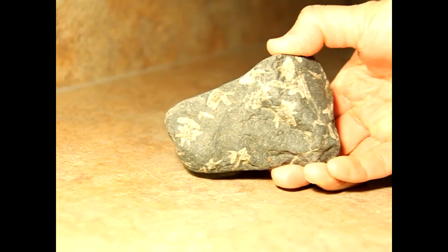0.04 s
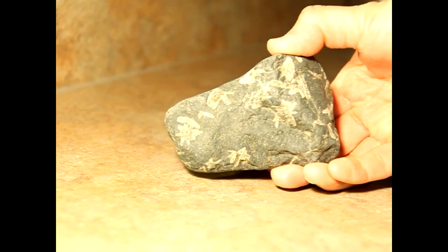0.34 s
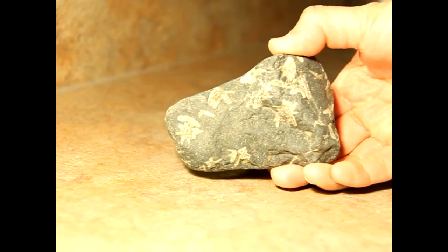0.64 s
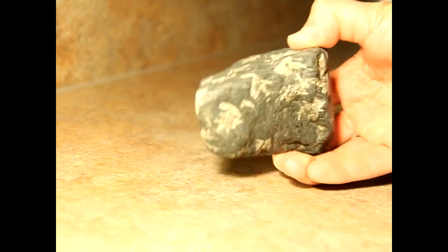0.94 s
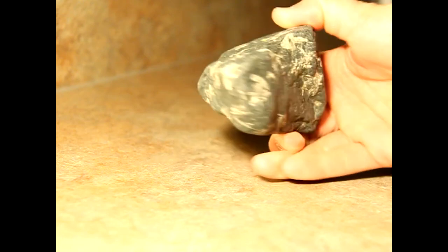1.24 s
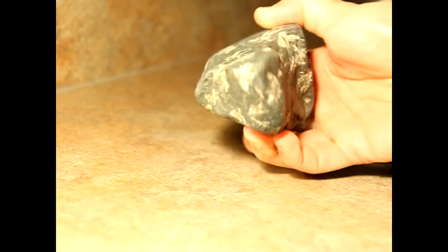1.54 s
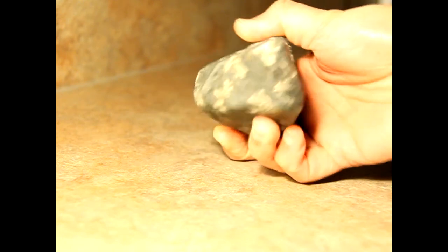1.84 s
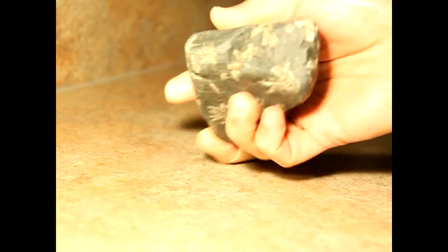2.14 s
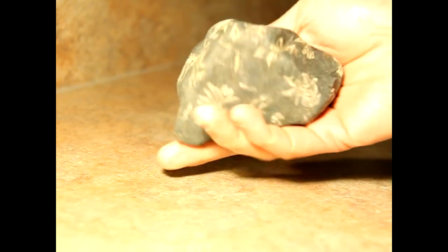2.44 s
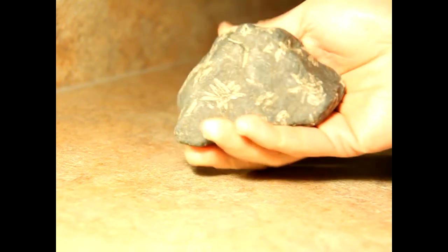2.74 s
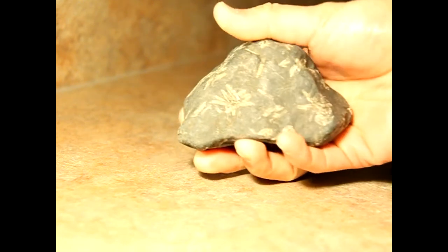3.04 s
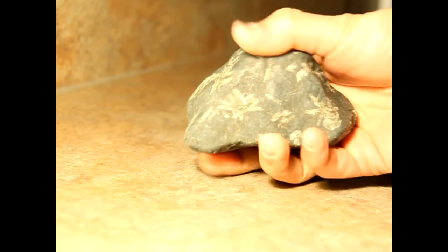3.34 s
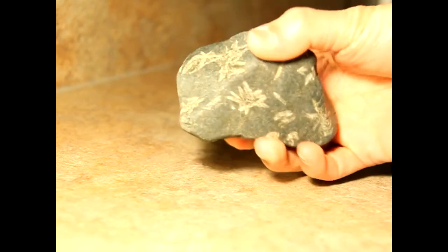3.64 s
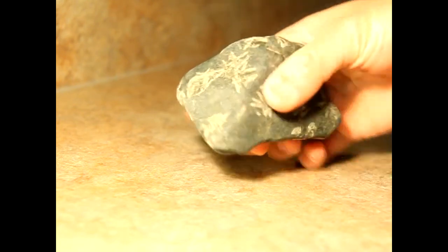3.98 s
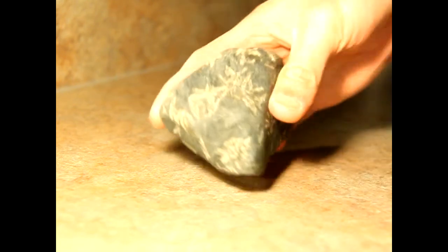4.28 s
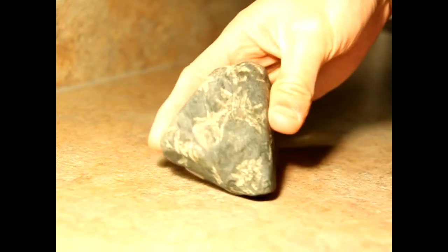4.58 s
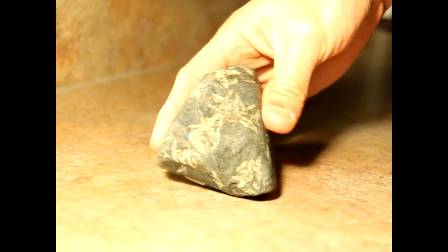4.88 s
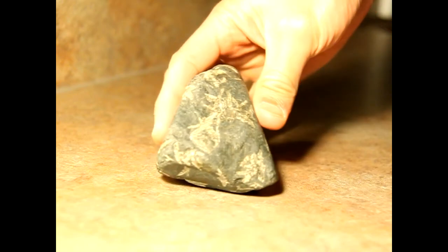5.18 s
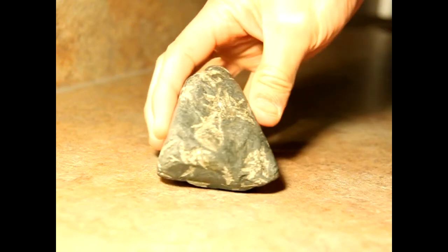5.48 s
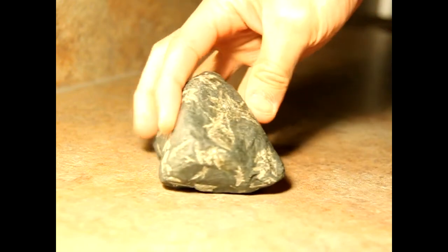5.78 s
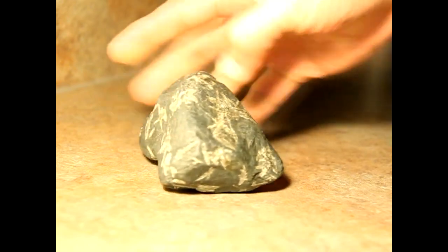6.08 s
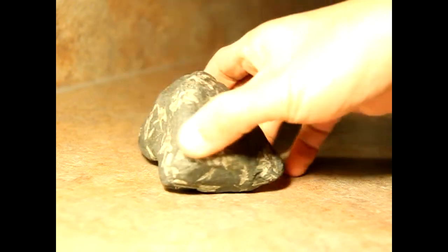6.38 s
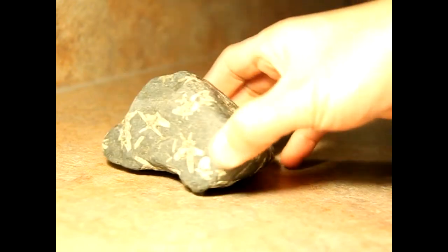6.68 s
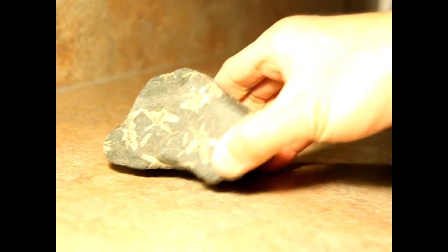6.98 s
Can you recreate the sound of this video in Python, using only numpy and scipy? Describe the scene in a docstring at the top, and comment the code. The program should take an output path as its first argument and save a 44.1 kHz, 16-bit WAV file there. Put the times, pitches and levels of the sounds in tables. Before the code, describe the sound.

Skin hisses softly on a turned stone, which is set on a countertop with a sharp, booming knock and pushed in growling scrapes.

```python
"""Skin hisses softly on rough rock as a hand turns a fist-sized stone, over faint room air and hum.
A fingertip squeaks and the stone pats the palm. It is set on a countertop, rocked onto its flat side
with a sharp knock that overloads the microphone, then pushed round in two scrapes as a fingernail
drags over it. Knocks boom in the hollow counter and stick-slip makes it growl; the contacts echo
off the near walls and ring in a small room."""
import sys
import numpy as np
from scipy import signal
from scipy.fft import rfft, irfft
from scipy.io import wavfile

SR = 44100
rng = np.random.default_rng(int(sys.argv[2]) if len(sys.argv) > 2 else 0)


def transcribe(signal):
    """Save signal, clipped to [-1, 1], as a 16-bit WAV file at the path in sys.argv[1]."""
    frames = np.atleast_2d(signal).T
    limited = np.clip(frames, -1, 1)
    pcm = np.round(limited * 32767).astype(np.int16)
    wavfile.write(sys.argv[1], SR, pcm)


N = 309582
TIME = np.arange(N) / SR
TOP_HZ = 15800

# tone of the room air: (frequency [Hz], level [dB])
AIR_EQ = [(25, -8.5), (60, -10), (90, -5), (130, -1.5), (200, -2.5), (420, -5), (540, -4), (680, -9),
          (1500, -10.5), (3000, -13), (6000, -15.5), (10000, -20), (15500, -24.5)]
# skin strokes as the fingers turn the stone and shift grip: (middle [s], length [s], peak level [dB])
FINGER_STROKES = [(.86, 0.21, -66), (1.08, .28, -68), (1.238, 0.17, -65.5), (1.513, 0.032, -54),
                  (1.542, 0.11, -57.5), (1.688, .16, -61.5), (1.878, 0.12, -58.5), (2.017, 0.11, -59),
                  (2.16, 0.082, -60.5), (2.263, 0.17, -60), (2.296, 0.033, -50.5), (2.355, 0.065, -60),
                  (2.492, 0.21, -59), (2.717, 0.16, -63), (2.833, 0.29, -61.5), (2.942, .1, -58),
                  (3.24, 0.13, -66.5), (3.37, .12, -64.5), (3.513, 0.2, -57.5), (3.659, 0.17, -58),
                  (3.85, .09, -65), (3.96, 0.15, -59.5), (4.167, .24, -59.5), (4.33, 0.15, -63),
                  (4.902, 0.16, -64.5), (5.026, 0.15, -67.5), (5.24, 0.37, -72)]
# tone of skin on rock: (frequency [Hz], level [dB])
SKIN_EQ = [(880, -28), (1500, -14), (2670, -3), (3720, -4), (4310, -2.5), (5090, -3), (11000, -0.5),
           (13000, -1), (15500, -6)]
# gaps between fingers and stone colour the hiss: (time [s], level [dB], half length [s], centre [Hz])
FINGER_GAPS = [(0.852, -73, .05, 8350), (1.521, -65.5, 0.019, 2200), (2.46, -68, .08, 4300),
               (3.55, -67, .07, 13000), (3.87, -68, 0.05, 13700), (4.14, -64, 0.037, 8340),
               (4.219, -66.5, 0.057, 6000)]
# the stone drops against the palm: (time [s], level [dB])
PALM_PATS = [(1.84, -10), (1.872, -18)]
# tone of the palm: (frequency [Hz], level [dB])
PALM_EQ = [(30, -12), (80, 1), (150, 3), (250, -10), (600, -26), (3000, -47)]
# slaps off the near walls: (delay [s], level [dB])
WALL_ECHOES = [(.0072, -9), (.0130, -14), (.0226, -14), (.0312, -17), (.0372, -16.5)]
# long ring of the counter and its cabinet: (frequency [Hz], level over the direct sound [dB], t60 [s])
CABINET_MODES = [(131.3, 7, 0.37), (162, 9.5, 0.48), (193.2, 7.5, 0.69), (248.1, 9, 0.58),
                 (266.6, 0.5, 0.71), (398, -3, 0.77), (453, 2.5, 0.74), (538, 4, .65), (668, 1, 0.77),
                 (745, -6.5, 0.96), (803, 6, .55), (1179, 7, 0.22), (1466, 7, 0.11), (2060, -8, .15)]
# bands of the diffuse room tail: (frequency [Hz], starting level [dB], t60 [s])
ROOM_TAIL = [(100, -39.5, 0.66), (252, -33.5, 0.43), (596, -38, 0.5), (1410, -36.5, 0.53),
             (3000, -37, 0.39), (6050, -35, 0.18), (14100, -39, 0.16)]
# stone meets counter; a higher corner is harder: (time [s], force [dB], corner [Hz], crunch send [dB])
STONE_KNOCKS = [(4.666, 21, 386, -18), (4.879, 7.5, 160, -37), (4.9368, 13, 300, -19.5),
                (5.5388, 14.5, 246, -29), (5.548, 17, 181, -29), (5.592, 21.5, 181, -21),
                (5.671, 29.5, 980, -13.5), (5.6856, 12, 650, -4.5), (5.945, 11, 161, -39),
                (6.4657, 5, 420, -3), (6.5313, 13, 450, -4)]
# the counter's answer to a tap: (frequency [Hz], level [dB])
COUNTER_EQ = [(30, -35), (75, -14), (120, -6.5), (220, -6), (330, -2.5), (470, 1.5), (640, -5),
              (1000, -9.5), (1550, -6.5), (2300, -13.5), (3000, -11.5), (4000, -16.5), (5200, -26),
              (8000, -22.5), (11000, -28), (14500, -17)]
# pushes that slide the stone: (start [s], attack [s], hold [s], release t60 [s], judder [dB], grit [dB])
PUSHES = [(5.298, 0.037, 0.18, .1, -67.5, -88), (5.526, 0.07, 0.073, .03, -35.5, -55.5),
          (5.862, 0.036, 0.07, 0.11, -41.5, -60), (6.27, 0.052, .03, .3, -60, -68),
          (6.409, 0.061, 0.089, 0.27, -27, -44.5), (6.858, 0.034, .125, .1, -39, -58.5)]
# low growl of the slide: (frequency [Hz], level [dB])
JUDDER_EQ = [(40, -60), (85, -16), (130, -10.5), (190, -2.5), (280, 1.5), (420, -3), (560, -13),
             (800, -27.5), (1500, -39), (4000, -72)]
# gritty top of the slide: (frequency [Hz], level [dB])
GRIT_EQ = [(300, -19), (700, 6), (950, 2.5), (1200, 4), (1650, -4), (2050, 0.5), (2400, -10), (2900, -3.5),
           (3600, -9), (4100, -14), (7000, -17.5), (9800, -26.5), (12300, -20.5), (15500, -27)]
# a fingernail drags over the stone: (start [s], attack [s], hold [s], release t60 [s])
NAIL_MOVE = (6.268, .015, .05, 0.043)
# the nail's hardest catches: (time [s], level [dB])
NAIL_TICKS = [(6.296, -24.5), (6.3262, -25), (6.332, -28)]
# tone of nail on stone: (frequency [Hz], level [dB])
NAIL_EQ = [(40, -34), (300, -8), (1000, 1), (1500, -8), (2550, -7), (2980, 1.5), (3450, -6.5), (4200, -3),
           (6000, -12), (8000, -13), (10000, -24), (15000, -27)]


def amp(db):
    """Decibels to gain."""
    return 10 ** (np.asarray(db) / 20)


def unit(x):
    """Scale to rms 1."""
    return x / np.sqrt(np.mean(x ** 2))


def add(out, s, sound):
    """Mix a short sound in at time s."""
    part = out[int(s * SR):][:len(sound)]
    part += sound[:len(part)]


def convolve(x, response):
    """Pass a sound through an impulse response."""
    return signal.oaconvolve(x, response)[:len(x)]


def eq(x, curve, size=4096):
    """Minimum-phase EQ through the points (frequency [Hz], level [dB])."""
    hz, db = np.transpose(curve)
    bin_hz = np.maximum(np.fft.rfftfreq(size, 1 / SR), 1)
    gain = amp(np.interp(np.log(bin_hz), np.log(hz), db))
    cepstrum = irfft(np.log(gain))
    cepstrum[1:size // 2] *= 2
    cepstrum[size // 2 + 1:] = 0
    return convolve(x, irfft(np.exp(rfft(cepstrum))))


def butter(x, hz, kind="low", order=2):
    """Gentle low-pass or high-pass."""
    sections = signal.butter(order, min(hz, TOP_HZ), kind, fs=SR, output="sos")
    return signal.sosfilt(sections, x + 1e-18)


def taps(rows, size=N):
    """One impulse for each row of (time [s], level [dB])."""
    s, db = np.transpose(rows)
    return np.bincount(np.abs(s * SR).astype(int), amp(db), size)[:size]


def background(air_db=-63, hum_db=-76.5, hum_hz=119):
    """A quiet bed of room air, microphone hiss and faint appliance hum."""
    air = unit(eq(rng.standard_normal(N), AIR_EQ))
    hum = unit(np.sin(2 * np.pi * hum_hz * TIME))
    return amp(air_db) * air + amp(hum_db) * hum


def grains(rate_hz, spread_db):
    """Random tiny impacts of uneven size."""
    hits = rng.random(N) < rate_hz / SR
    sizes = amp(spread_db * rng.standard_normal(N).clip(-2, 2))
    return hits * sizes * rng.choice([-1, 1], N)


def stroke(middle, length, edge_db=-12):
    """Speed of a finger stroke: a smooth swell, down to edge_db half a length from its middle."""
    return amp(np.maximum(edge_db * (2 * (TIME - middle) / length) ** 2, -200))


def hand(flesh_db=-15.5, gap_q=8):
    """Skin hisses over the rock's fine grain, louder as it slides faster; the flesh rumbles with it."""
    moves = [*FINGER_STROKES, (2.5, 6.3, -75)]  # one long, light touch while the stone turns
    speed = np.sqrt(sum((amp(db) * stroke(s, length)) ** 2 for s, length, db in moves))
    friction = eq(grains(rate_hz=9000, spread_db=1), SKIN_EQ)
    hiss = unit(butter(friction, 1800, "high"))
    flesh = unit(butter(butter(rng.standard_normal(N), 420), 170, "high"))
    out = speed * (hiss + amp(flesh_db) * flesh)
    for s, db, half_length, hz in FINGER_GAPS:
        swell = signal.windows.gaussian(int(6 * half_length * SR), half_length * SR)
        hollow = signal.lfilter(*signal.iirpeak(hz, gap_q, fs=SR), rng.standard_normal(len(swell)))
        add(out, s - len(swell) / 2 / SR, amp(db) * swell * unit(hollow))
    return out


def squeak(middle_s=1.2, length_s=0.2, db=-72.5, start_hz=2500, end_hz=1700, settle_s=0.055):
    """A fingertip sticks and slips on a smooth patch: a faint, unsteady tone that falls as it slows."""
    t = np.maximum(TIME - middle_s + length_s / 2, 0)
    glide_hz = end_hz + (start_hz - end_hz) * np.exp(-t / settle_s)
    waver = 1 + 0.012 * unit(butter(rng.standard_normal(N), 150))
    tone = unit(np.sin(2 * np.pi * np.cumsum(glide_hz * waver) / SR))
    return amp(db) * stroke(middle_s, length_s) * tone


def pats():
    """The stone drops into the soft palm with a dull double pat."""
    return eq(taps(PALM_PATS), PALM_EQ)


def room(x, echo_top_hz=1300, build_up_s=0.0056, size=44100):
    """Direct sound, dull echoes off the near walls, the ring of counter and cabinet, a diffuse tail."""
    t = TIME[:size]
    response = butter(taps(WALL_ECHOES, size), echo_top_hz)
    response[0] += 1  # direct sound
    for hz, db, t60 in CABINET_MODES:
        decay = np.log(1000) / t60
        response += amp(db) * 2 * decay / SR * np.exp(-decay * t) * np.cos(2 * np.pi * hz * t)
    noise_spectrum = rfft(rng.standard_normal(size))
    log_hz = np.log(np.maximum(np.fft.rfftfreq(size, 1 / SR), 1))
    log_centres = np.log([row[0] for row in ROOM_TAIL])
    build_up = 1 - np.exp(-(t / build_up_s) ** 2)
    for band, (_, db, t60) in zip(np.eye(len(ROOM_TAIL)), ROOM_TAIL):
        tail = irfft(noise_spectrum * np.interp(log_hz, log_centres, band), size)
        response += amp(db) * tail * build_up * np.exp(-np.log(1000) * t / t60)
    return convolve(x, response)


def knocks(crunch_s=0.0031, crunch_top_ratio=3.6, size=2048):
    """Each blow drives the counter with a rounded thump of the stone's weight and a crunch of grit."""
    force = np.zeros(N)
    for s, db, corner_hz, crunch_db in STONE_KNOCKS:
        thump = butter(signal.unit_impulse(size), corner_hz, order=4)
        burst = rng.standard_normal(size) * np.exp(-(TIME[:size] / crunch_s) ** 2)
        crunch = butter(burst / np.linalg.norm(burst), corner_hz, "high")
        crunch = butter(crunch, crunch_top_ratio * corner_hz, order=1)  # softer contact, duller crunch
        add(force, s, amp(db) * (thump + amp(crunch_db) * crunch))
    return eq(force, COUNTER_EQ)


def stick_slip(rate_hz, jitter, spread_db, count=6000):
    """A sliding contact catches and lets go at uneven intervals, one impulse a slip."""
    gap, size = rng.standard_normal((count, 2)).T
    times = np.cumsum(np.exp(jitter * gap)) / rate_hz
    slips = np.column_stack([times, spread_db * size.clip(-2, 2)])
    return taps(slips[times < TIME[-1]])


def push_speed(start, attack, hold, release, curve=1.4):
    """Speed of a push: it builds up, holds, and dies away under friction."""
    t = TIME - start
    rise = np.clip(t / attack, 0, 1) ** curve
    return rise * np.exp(-np.log(1000) * np.maximum(t - attack - hold, 0) / release)


def scrapes(bite_db=2, bite_s=0.0015, grit_power=0.95):
    """Stick-slip makes the counter growl; grit crunches under the stone, hardest just after each slip."""
    slips = stick_slip(rate_hz=260, jitter=0.6, spread_db=2)
    judder = unit(eq(slips - slips.mean(), JUDDER_EQ))
    bite = 1 + amp(bite_db) * signal.lfilter([1], [1, -np.exp(-1 / (bite_s * SR))], slips)
    grit = unit(eq(bite * grains(rate_hz=7000, spread_db=2), GRIT_EQ))
    out = np.zeros(N)
    for start, attack, hold, release, judder_db, grit_db in PUSHES:
        speed = push_speed(start, attack, hold, release)
        out += amp(judder_db) * speed * judder + amp(grit_db) * speed ** grit_power * grit
    return out


def jolt(time_s=5.671, force_db=18, low_hz=18, top_hz=55, size=8192):
    """The heaviest blow shakes the microphone's support through the counter: a deep thud."""
    thud = butter(butter(signal.unit_impulse(size), top_hz), low_hz, "high")
    out = np.zeros(N)
    add(out, time_s, amp(force_db) * thud)
    return out


def nail(drag_db=-25.5, scratch_db=-19, scratch_s=0.0031, ring_hz=3020, ring_width_hz=240, ring_db=-9):
    """The dragging nail catches unevenly; each catch ticks, scratches and briefly rings the stone."""
    speed = push_speed(*NAIL_MOVE)
    catches = amp(drag_db) * speed * stick_slip(rate_hz=140, jitter=0.36, spread_db=-2)
    t = TIME[:2048]
    scratch = amp(scratch_db) * rng.standard_normal(len(t)) * np.exp(-t / scratch_s)
    scratch[0] = 1  # the tick that leads the scratch
    ticks = eq(convolve(catches + taps(NAIL_TICKS), scratch), NAIL_EQ)
    ring = signal.lfilter(*signal.iirpeak(ring_hz, ring_hz / ring_width_hz, fs=SR), ticks)
    return ticks + amp(ring_db) * ring


def scene():
    """Knocks, scrapes, nail and pats go through the room; jolt, skin, squeak and the bed stay dry."""
    contacts = knocks() + scrapes() + nail() + pats()
    return (room(contacts) + jolt() + hand() + squeak() + background())[None]


def record(dry):
    """The input clips flat on the hardest knock; a steep low-pass cuts the top."""
    ceiling = 0.44
    low_pass = signal.ellip(8, 0.2, 70, TOP_HZ, fs=SR, output="sos")
    return signal.sosfilt(low_pass, np.clip(dry, -ceiling, ceiling))


dry = scene()
out = record(dry)
transcribe(out)
```